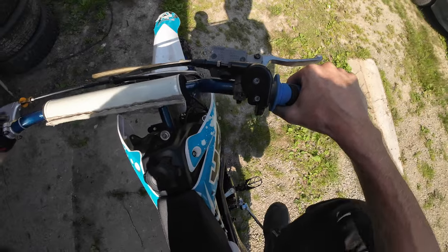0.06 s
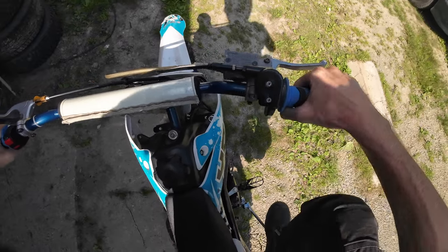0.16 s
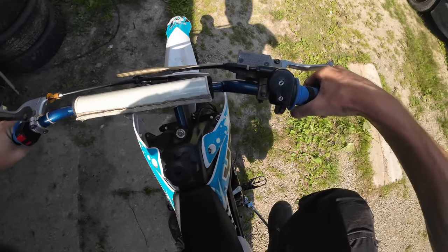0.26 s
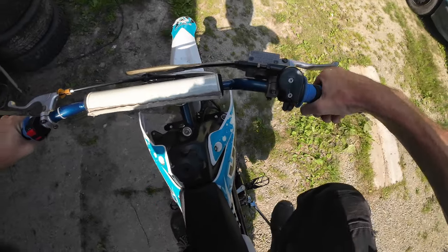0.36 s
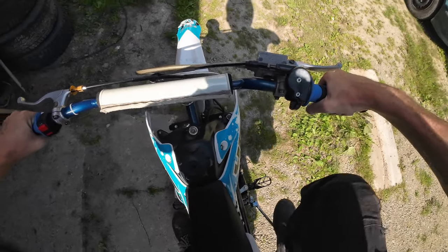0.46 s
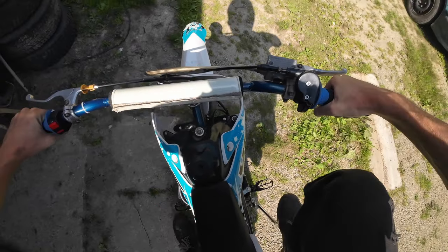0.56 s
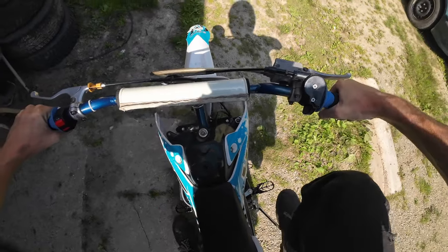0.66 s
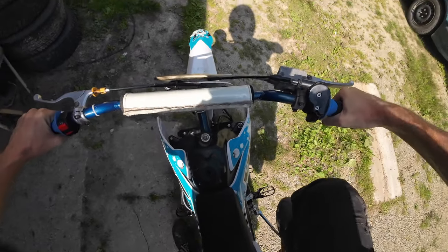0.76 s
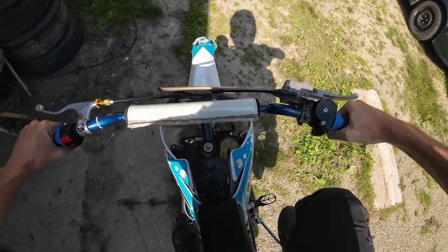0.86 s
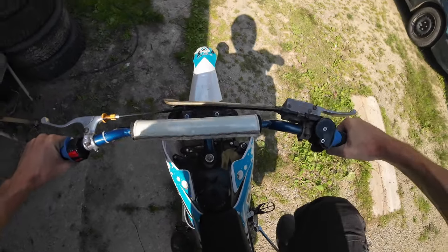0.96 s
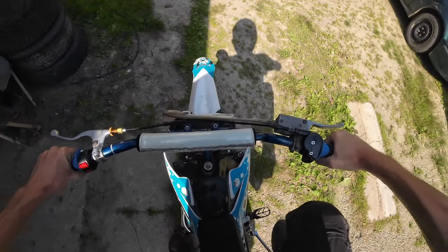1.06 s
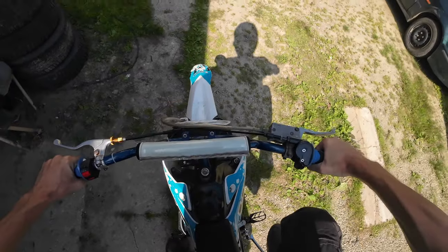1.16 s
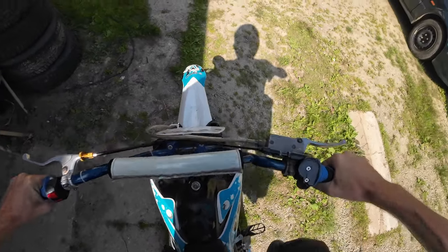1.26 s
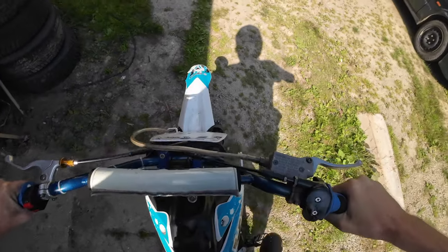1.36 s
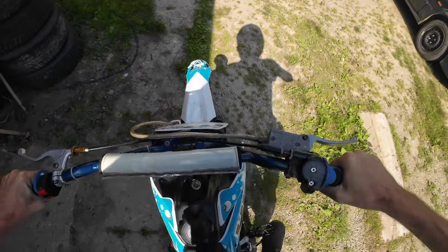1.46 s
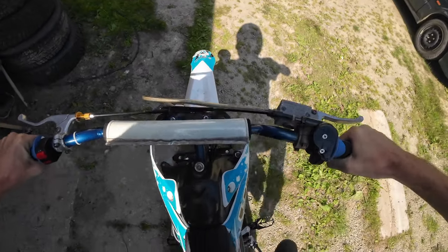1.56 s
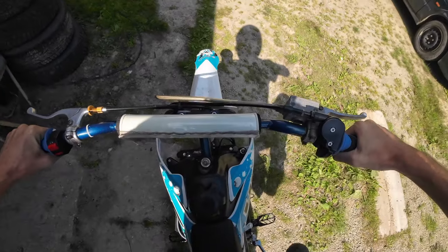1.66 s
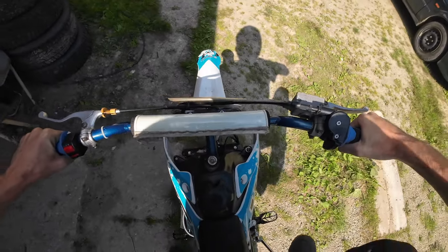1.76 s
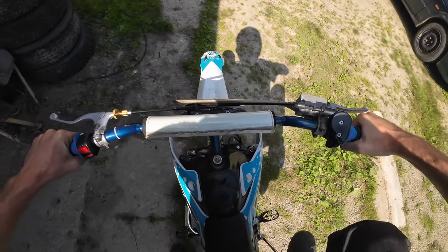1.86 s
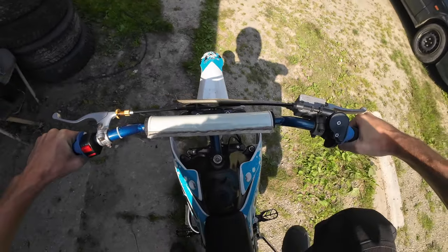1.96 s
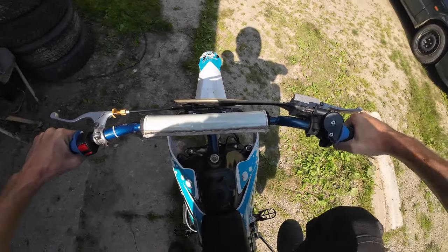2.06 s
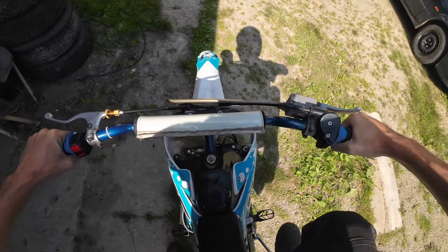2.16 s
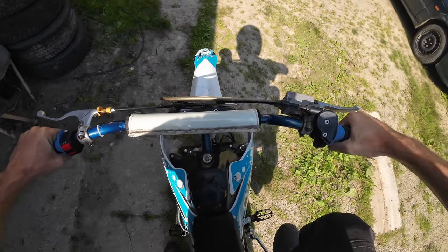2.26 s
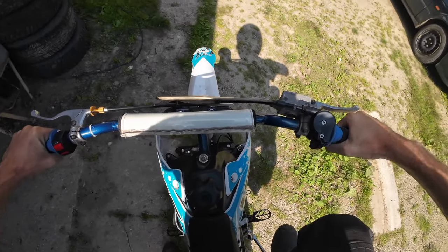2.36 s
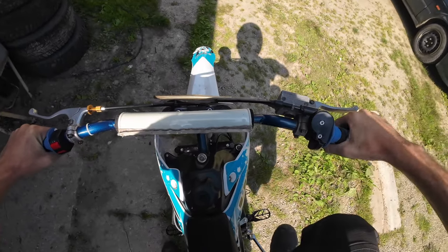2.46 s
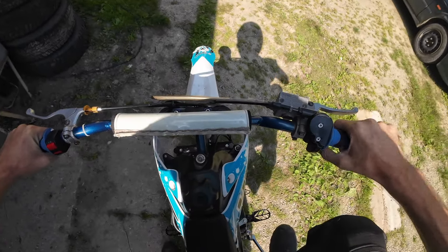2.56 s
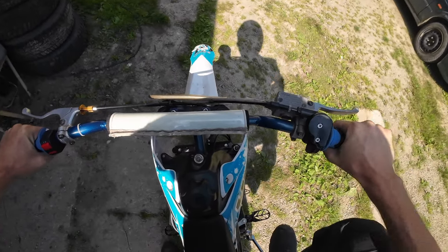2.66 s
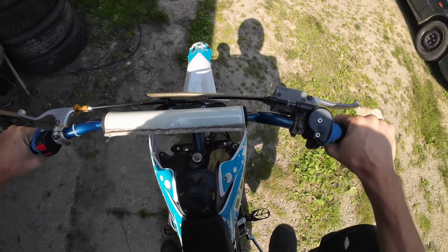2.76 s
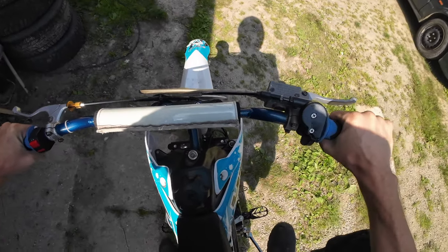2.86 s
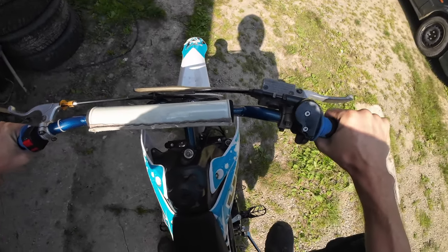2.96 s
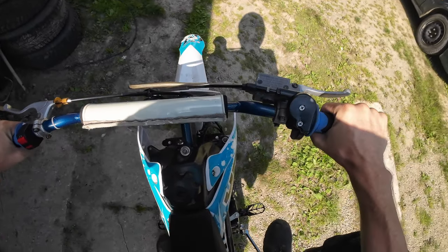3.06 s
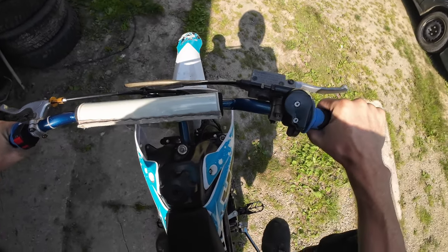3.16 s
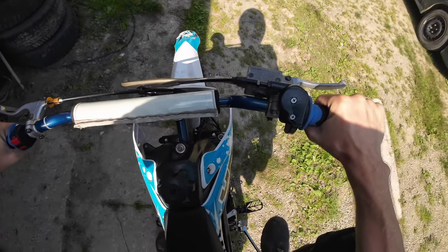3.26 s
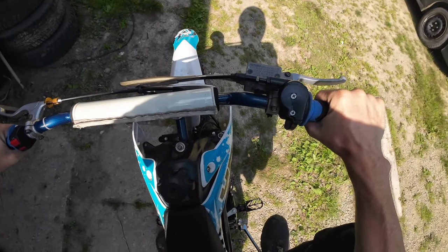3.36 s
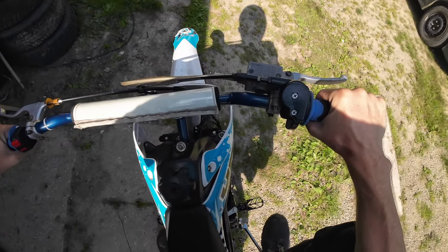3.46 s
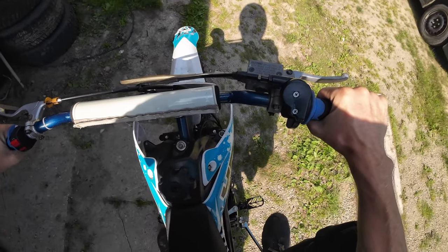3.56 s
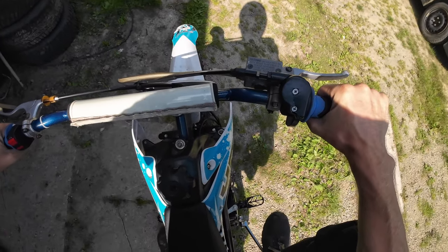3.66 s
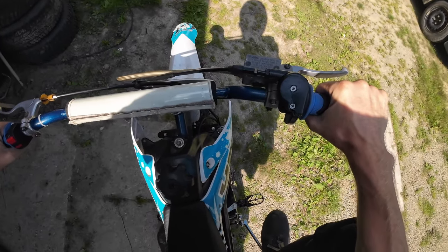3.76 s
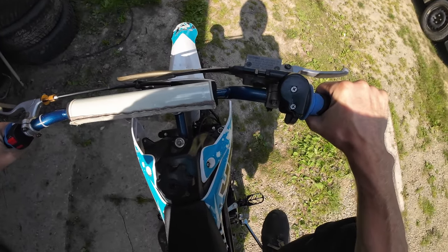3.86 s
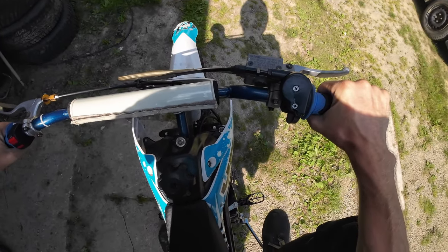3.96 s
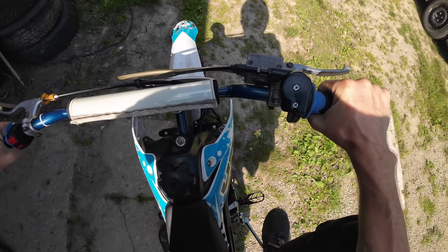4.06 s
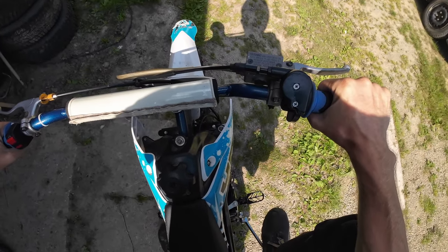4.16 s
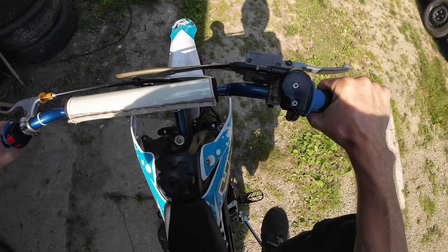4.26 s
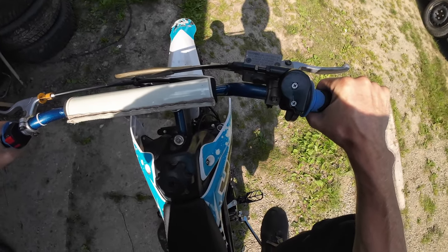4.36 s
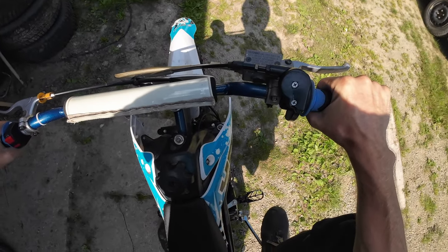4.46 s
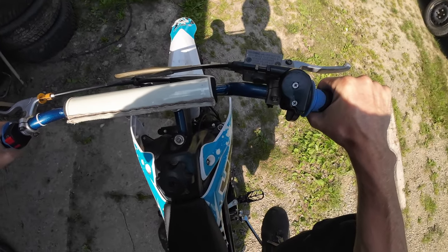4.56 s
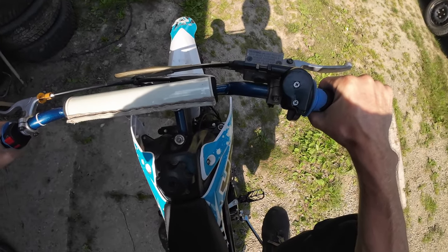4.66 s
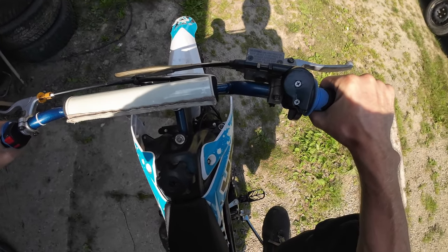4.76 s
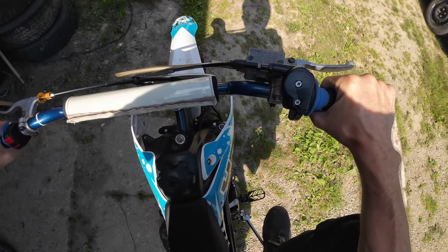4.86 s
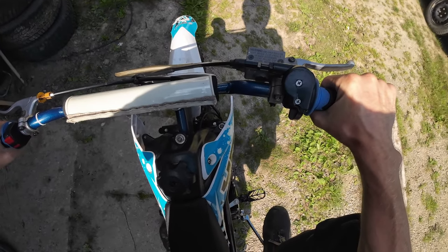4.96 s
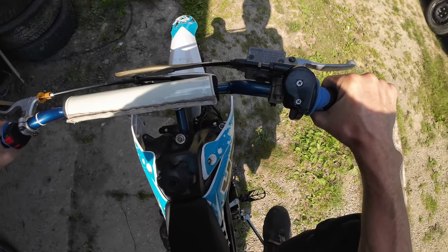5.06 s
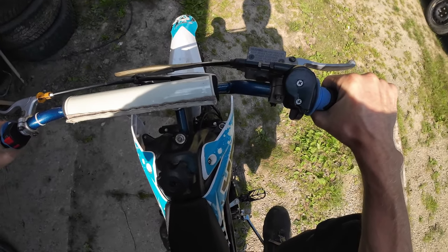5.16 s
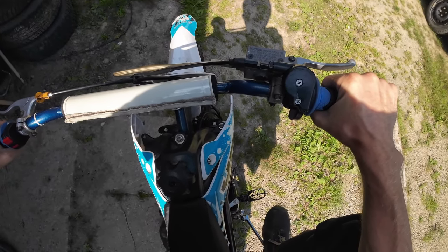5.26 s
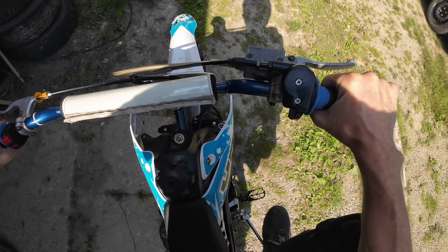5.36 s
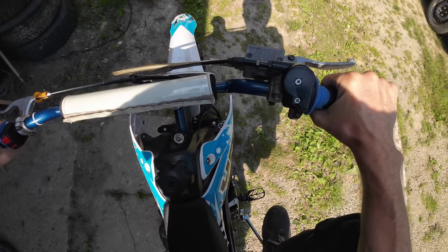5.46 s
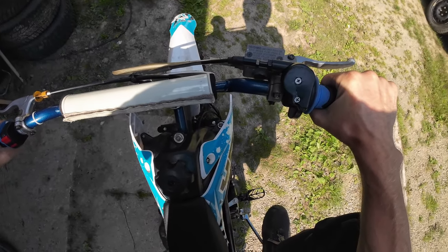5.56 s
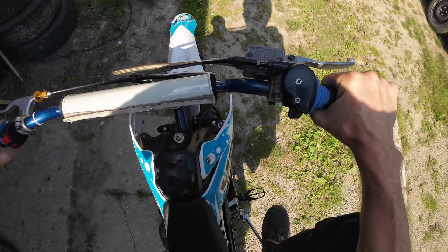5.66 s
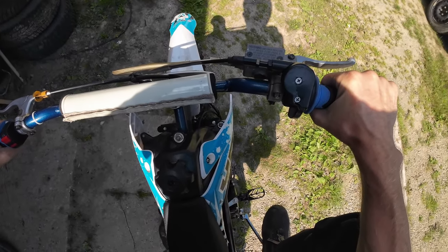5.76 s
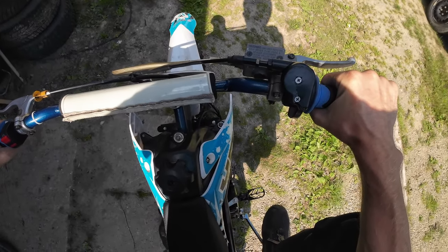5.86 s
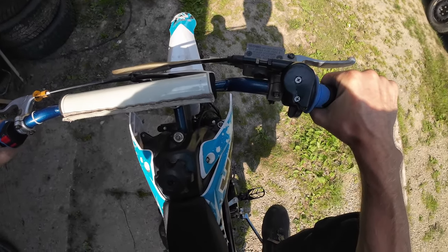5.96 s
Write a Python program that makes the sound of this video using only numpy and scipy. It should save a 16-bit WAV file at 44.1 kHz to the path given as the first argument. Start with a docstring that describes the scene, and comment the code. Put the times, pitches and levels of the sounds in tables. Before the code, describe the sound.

Small dirt bike fails to start: metallic clicks, three quick deep chugs under rattling gears, a sharp lever clack, quiet yard, then buffeting gusts.

```python
"""The engine of a small dirt bike chugs over three times from one kick and does not start.
Each chug is a short sine boom with a puff of exhaust; ringing noise bursts make the ratchet clicks, and
many tiny ringing contacts make the whirr of the gears. Noise bursts and sines make the lever clack, first
as it folds out and again as it goes back. Behind it, shaped noise makes far cars, clothing and a windy gust
that thumps the microphone on the rider's head. A throttle grip ticks and an insect rasps faintly."""
import sys
import numpy as np
from scipy import signal
from scipy.fft import rfft, irfft
from scipy.io import wavfile

SR = 44100
rng = np.random.default_rng(int(sys.argv[2]) if len(sys.argv) > 2 else 0)


def wav_record(signal):
    """Record a signal, one row per channel, as 16-bit PCM in the file named by sys.argv[1]."""
    frames = np.transpose(np.atleast_2d(signal))
    bounded = np.clip(frames, -1, 1)
    # unit amplitude maps onto the largest positive 16-bit level
    quanta = np.round(bounded * 32767).astype(np.int16)
    wavfile.write(sys.argv[1], SR, quanta)


N = 264688
TIME = np.arange(N) / SR

# The piston strokes. Each row: start in seconds, level in dB, airbox pitch in Hz, length in seconds,
# level of the opening thud in dB, delay of the exhaust puff in seconds, level of the puff in dB.
STROKES = [(1.3933, -10.5, 78.2, 0.023, -28, 0.029, -21.5), (1.482, -11, 85, 0.058, -17.5, 0.023, -18.5),
           (1.583, -9.5, 80.6, 0.041, -37, .039, -25)]
# The pitches at which the crankcase rings. Each row: pitch in Hz, level in dB, time to fall 60 dB in seconds.
CRANKCASE = [(322, -0.5, .12), (464, -5.5, 0.16), (809, -5, 0.17), (1226, -7.5, 0.14), (1353, -6, .3),
             (1508, -2.5, .1), (1700, -7.5, .08), (1826, -1, 0.13), (1910, 0, .15), (2616, -2.5, .06),
             (3060, -3.5, 0.068), (3648, -8.5, .12), (4340, -7, 0.11), (5226, -7, .1), (6270, -4, .12)]
# The tone of moving air. Each row: frequency in Hz, level in dB per Hz.
WIND_TONE = [(12, -2), (25, 4), (55, -6.5), (90, -16), (160, -28), (300, -44.5), (700, -69)]


def from_db(db):
    """Turn decibels into a gain."""
    return 10 ** (np.asarray(db) / 20)


def rms_one(x):
    """Scale to unit power."""
    return x / np.sqrt(np.mean(x ** 2) + 1e-20)


def noise(count=N):
    """Two rows of white noise: hiss with equal power at all frequencies."""
    return rng.standard_normal((2, count))


def between(start, end, fade=.02):
    """A gain of one inside a time span, with soft edges."""
    return np.clip(np.minimum(TIME - start, end - TIME) / fade, 0, 1)


def bump(s, length):
    """A bell-shaped rise and fall around a moment."""
    return np.exp(-.5 * ((TIME - s) / length) ** 2)


def swell(s, db, rise_db_per_s, fall_db_per_s):
    """A gain that climbs to a peak and sinks again."""
    return from_db(db - np.maximum(rise_db_per_s * (s - TIME), fall_db_per_s * (TIME - s)))


def held(start, attack, end, fall_db_per_s):
    """A gain that rises, holds at one and then dies away."""
    return np.clip((TIME - start) / attack, 0, 1) * from_db(-fall_db_per_s * np.maximum(TIME - end, 0))


def dying(t60, count=20000):
    """Exponential decay from 1 that falls 60 dB in t60 seconds."""
    return np.exp(-np.log(1000) * np.arange(count) / SR / t60)


def response(points, tilt=0, size=8192):
    """A filter (minimum-phase impulse response) with a given spectrum, falling away above its last point."""
    hz, db = np.transpose(points)
    octave = np.log2(np.maximum(np.arange(size // 2 + 1), .5) * SR / size)
    shape_db = np.interp(octave, np.log2(hz), db) - 20 * np.maximum(octave - np.log2(hz[-1]), 0)
    tilt_db = tilt * np.maximum(octave, np.log2(hz[0]))
    # folding the cepstrum puts the energy of the response as early as possible
    cepstrum = irfft(np.log(from_db(shape_db + tilt_db)))
    cepstrum[1:size // 2] *= 2
    cepstrum[size // 2 + 1:] = 0
    return irfft(np.exp(rfft(cepstrum)))


def through(x, impulse):
    """Filter along time by convolution, keeping the length."""
    return signal.fftconvolve(np.atleast_2d(x), np.atleast_2d(impulse), axes=-1)[:, :x.shape[-1]]


def colour(x, points, tilt=0):
    """Give a spectrum to white sound and keep its power."""
    impulse = response(points, tilt)
    return through(x, impulse / np.linalg.norm(impulse))


def spread(pair):
    """Two unrelated signals become left and right, alike in the bass and apart in the treble."""
    # The width of the sound. Each row: frequency in Hz, level of the side signal against the middle in dB.
    side_level = [(60, -15.5), (300, -15.5), (1300, -17), (2400, -10), (4400, -7.5), (8000, -2.5),
                  (15000, -2)]
    return pair[0] + through(pair[1], response(side_level)) * [[1], [-1]]


def ring(x, hz, t60):
    """A resonance: a unit click sets a dying sine of height 1 going."""
    r = from_db(-60 / (t60 * SR))
    w = 2 * np.pi * hz / SR
    return signal.lfilter([0, np.sin(w)], [1, -2 * r * np.cos(w), r * r], x + 1e-18)


def add(out, s, sound):
    """Mix a sound in at a time in seconds."""
    at = int(s * SR)
    out[:, at:at + sound.shape[-1]] += sound[:, :N - at]


def contact(points, tilt, t60, tail_db, tail_t60):
    """A knock: crowded resonances, heard as noise, that die at once, and a weaker tail."""
    fall = dying(t60) + from_db(tail_db) * dying(tail_t60)
    return colour(noise(len(fall)) * fall, points, tilt)


def chugs(rise_s=0.002, fall_s=0.0021, sag_s=0.08, steepen=0.12, tail_db=-18.5, thud_t60=0.09):
    """Each stroke opens with a thud, draws a few cycles of airbox boom, then puffs unburnt through the pipe."""
    # The hum of tank and frame. Each row: pitch in Hz, level in dB, time to fall 60 dB in seconds.
    frame_modes = [(91.26, 3, 0.57), (136, -6, 0.57)]
    # The exhaust resonances. Each row: pitch in Hz, width in Hz, level in dB.
    pipe_modes = [(135, 24, -1.5), (200, 25, -6), (252, 22, -5), (327.3, 23, -1.5), (445, 20, -14)]
    # The tone of the opening thud. Each row: frequency in Hz, level in dB per Hz.
    thud_tone = [(60, -10.5), (130, 3), (180, -9.5), (250, -1), (340, -16), (450, -14), (560, -33)]
    out = np.zeros((2, N))
    age = np.arange(SR // 2) / SR
    for s, db, hz, length, thud_db, delay, puff_db in STROKES:
        opening = 1 - np.exp(-age / rise_s)
        valve = opening * np.exp(-age / sag_s - np.maximum(age - length, 0) / fall_s)
        boom = valve * np.sin(2 * np.pi * hz * age)
        boom = boom + steepen * (boom ** 2 + boom ** 3)   # strong pressure swings grow pointed
        hum = np.zeros(len(age))
        for mode_hz, mode_db, t60 in frame_modes:
            tone = np.sin(2 * np.pi * mode_hz * age)
            hum += from_db(tail_db + mode_db) * tone * dying(t60, count=len(age))
        add(out, s, (from_db(db) * (boom + hum))[None])
        thud = contact(thud_tone, 0, thud_t60, tail_db=-25.5, tail_t60=0.27)[:1]
        add(out, s, from_db(thud_db) * thud)
        puff = np.zeros(len(age))
        for k, (pipe_hz, width, pipe_db) in enumerate(pipe_modes):
            tone = np.sin(2 * np.pi * pipe_hz * age) * np.exp(-np.pi * width * age)
            puff += from_db(pipe_db) * tone * (-1) ** k   # neighbours start in opposite directions
        add(out, s + delay, (from_db(puff_db) * puff)[None])
    return out


def ratchet(vary_db=3.5, tilt_db=1.0, crack_db=1.5, crack_t60=.007, tail_db=-20.5, case_db=-26.0, count=17):
    """Starter teeth ride over each other, faster, then slower with the crank; each rings the crankcase."""
    # The pace of the ratchet. Each row: time in seconds, gap to the next tooth in seconds.
    tooth_gap = [(1.4867, .0163), (1.503, .0116), (1.572, .0117), (1.585, .0152), (1.723, .0276)]
    # The tone of a tooth, before each one varies. Each row: frequency in Hz, level in dB per Hz.
    tooth_tone = [(290, -37), (500, -7), (659, -8.5), (784, -2.5), (960, -9.5), (1080, -1.5), (1210, 2.5),
                  (2540, -1), (3200, 1), (5240, 2), (6800, -5), (11500, -7.5), (13300, -28), (15100, -21.5),
                  (16000, -33)]
    tooth_db, fade_db_per_s = -23.5, 12   # later teeth land more softly
    # the first tooth breaks loose under load, the last barely lifts
    accents_db = [1.5] + [0] * (count - 2) + [-6]
    crack = from_db(crack_db) * dying(crack_t60)
    rattle = from_db(-2.5) * dying(0.0317)
    fall = crack + rattle + from_db(tail_db) * dying(.15)
    out, knocks = np.zeros((2, N)), np.zeros(N)
    s = first = tooth_gap[0][0]
    for accent_db in accents_db:
        landing = [(hz, band_db + rng.normal(0, vary_db)) for hz, band_db in tooth_tone]
        strength = from_db(tooth_db + accent_db - fade_db_per_s * (s - first))
        add(out, s, strength * colour(noise(len(fall)) * fall, landing, tilt_db))
        knocks[int(s * SR)] = strength
        s += np.interp(s, *np.transpose(tooth_gap))
    case = sum(from_db(case_db + db) * ring(knocks * rng.standard_normal(N), hz, t60)
               for hz, db, t60 in CRANKCASE)
    return spread(out) + case


def gears(mesh_db=-3.5, case_db=-10.5, ticks_per_s=1800, size_db=4.5, tick_t60=.025, smooth_db=-8.0,
          take_up_s=.06, vent_db=-38.5, vent_fall_db_per_s=260, grain_share=.25, grain_s=.001, count=40):
    """Gears and chain rattle in small ringing contacts, denser with effort; each exhaust puff adds a hiss."""
    # The tones of the whirr and of its hiss. Each row: frequency in Hz, level in dB per Hz.
    whirr_tone = [(120, -38), (200, -4), (330, -9), (384, -13), (446, -13.5), (642, -21), (784, -10.5),
                  (995, -15.5), (1140, -9.5), (1620, -15), (1860, -11), (2300, -18), (4000, -25),
                  (5200, -49.5), (8800, -120)]
    hiss_tone = [(2200, -23), (3700, -1.5), (5500, 2.5), (7200, -7.5), (10000, -4), (11600, -3.5),
                 (13000, -18.5), (15000, -13.5), (16000, -14)]
    turning = between(1.348, 1.84, fade=take_up_s)
    # the gears swell under the boot
    effort = turning * swell(1.51, -31.5, rise_db_per_s=70, fall_db_per_s=43)
    load = effort / effort.max()
    density = np.sqrt(load)
    happens = rng.random(N) < density * ticks_per_s / SR
    size = from_db(size_db * np.clip(rng.standard_normal(N), -2, 2))
    ticks = happens * size * rng.choice([-1, 1], N)
    ticks = ticks / np.sqrt(density + 1e-3)   # sparse ticks are made larger to even out the power
    # each tick is dealt at random to one of the pitches
    dealt = rng.integers(0, count, N)
    pitches = np.linspace(350, 4000, count)
    grains = sum(ring(ticks * (dealt == k), hz, tick_t60) for k, hz in enumerate(pitches))
    whirr = from_db(smooth_db) * noise()
    whirr[0] += .5 * grains / grains[turning > 0].std()
    whirr = from_db(mesh_db) * colour(whirr * effort, whirr_tone)
    # the crankcase rings mainly under the heaviest load
    shake = noise()[0] * from_db(case_db) * effort * load
    case = sum(from_db(db) * ring(shake, hz, t60) / np.sqrt(t60 * SR / 20) for hz, db, t60 in CRANKCASE)
    # the contacts also spit treble
    spits = signal.lfilter([1], [1, -np.exp(-1 / (grain_s * SR))], ticks ** 2 + 1e-18)
    grainy = np.sqrt(1 - grain_share + grain_share * spits / spits[turning > 0].mean())
    rasp = turning * swell(1.535, -38, rise_db_per_s=98, fall_db_per_s=62) * grainy
    vents = sum(held(s + delay - .003, .003, s + delay, vent_fall_db_per_s)
                for s, *_, delay, _ in STROKES)
    hiss = colour(noise() * np.hypot(rasp, from_db(vent_db) * vents), hiss_tone)
    return spread(whirr + hiss) + case


def lever(ring_db=3.5, pivot_db=-2.0, folded_s=1.0):
    """Knocks ring the pivot while the lever is folded out and the lever itself afterwards."""
    # Contacts of lever and foot peg, and the dull knocks of the gears engaging near 1.32 and 1.36 s.
    # Each row: start in seconds, level in dB, tilt in dB per octave, time to fall 60 dB in seconds.
    clack_hits = [(0.26, -54.5, 1, 0.018), (0.355, -45.5, -4.5, .011), (0.6318, -29, 1, 0.028),
                  (0.634, -33, -1.5, 0.038), (0.787, -40, -5, 0.082), (0.792, -40.5, 9.5, 0.039),
                  (0.799, -36, -7.5, .028), (1.251, -44, 6, 0.034), (1.321, -46.5, -7, .18),
                  (1.359, -44, -4.5, 0.28), (1.8629, -27, 1.5, 0.017), (1.866, -23, 3, .033),
                  (2.129, -51, -2, .046), (2.132, -45, -7, .05), (2.481, -64, 3, 0.046),
                  (2.511, -56.5, -3, 0.026), (2.657, -51, -8, .05)]
    # The dry pivot slips as the lever swings out. Each row: start in seconds, level in dB,
    # time to fall 60 dB in seconds.
    pivot_slips = [(0.542, -60, 0.074), (0.562, -46, 0.06), (0.611, -58, 0.15), (0.781, -47, 0.077)]
    # Ringing of the lever and of its pivot. Each row: pitch in Hz, level in dB, time to fall 60 dB in seconds.
    lever_modes = [(1349, -6.5, .33), (1640, 0, 0.0994), (2360, -9.5, 0.18), (2960, -5.5, 0.2),
                   (3250, -3, .13), (3160, -4, 0.15), (3247, -1, 0.17), (4620, -7, 0.12), (4700, -8, 0.2),
                   (5070, -8.5, .15), (5335, -6.5, 0.18), (5600, -6, 0.13), (6277, -11.5, 0.24),
                   (6923, -14.5, .18), (8700, -13.5, .17), (8800, -11, .13)]
    pivot_modes = [(1184, -20, .25), (1954, -11, .18), (2632, -4, .38), (3478, 3, .12), (3640, 1, .1),
                   (5098, -7, .16)]
    # The tone of a knock, before its tilt. Each row: frequency in Hz, level in dB per Hz.
    clack_tone = [(150, -11), (500, -7.5), (1000, -0.5), (1700, 0.5), (3200, -3), (4000, -4.5),
                  (5200, -0.5), (7500, -13.5), (11000, -10), (13000, -28), (16000, -27)]
    slip_tone = [(600, -2.5), (1500, 3), (3200, -10), (4900, 3.5), (6500, -22), (10000, -28), (13000, -39)]
    out = np.zeros((2, N))
    for s, db, tilt, t60 in clack_hits:
        ringing_db = -19 + 1.8 * min(tilt, 0)   # dull blows ring less
        hit = contact(clack_tone, tilt, t60, tail_db=ringing_db - 1, tail_t60=.22)
        age = np.arange(hit.shape[1]) / SR
        modes, modes_db = (pivot_modes, pivot_db) if s < folded_s else (lever_modes, ring_db)
        for hz, mode_db, mode_t60 in modes:
            strength = from_db(modes_db + ringing_db + mode_db + rng.normal(0, 1.5, (2, 1)))
            tone = np.sin(2 * np.pi * (hz * age + rng.random((2, 1))))
            hit = hit + strength * tone * dying(mode_t60)
        add(out, s, from_db(db) * hit)
    for s, db, t60 in pivot_slips:
        add(out, s, from_db(db) * contact(slip_tone, 0, t60, tail_db=-17, tail_t60=0.18))
    return spread(out)


def lever_stop(t60=0.05):
    """The lever reaches the bottom of its swing: a short noise burst clinks amid the ratcheting."""
    clink_tone = [(1200, -26.5), (2200, -17.5), (2580, -4), (2900, -15), (6000, -14), (11000, -18)]
    out = np.zeros((2, N))
    add(out, 1.617, from_db(-29) * contact(clink_tone, 0, t60, tail_db=-27, tail_t60=.12))
    return spread(out)


def yard(x, delay_s=0.0043):
    """Ground, wall and parked things scatter a short, duller tail."""
    fall = dying(0.18) * (np.arange(20000) > delay_s * SR)
    tail_tone = [(100, 1.5), (1000, 4.5), (5000, 3.0), (14000, -11.5)]
    tail = colour(noise(len(fall)) * fall, tail_tone)
    return from_db(-17) * through(x.mean(0), spread(tail / np.linalg.norm(tail[0])))


def grip():
    """One small plastic tick, from two close contacts, as the hand takes a new hold."""
    # The throttle grip ticks in its housing. Each row: start in seconds, level in dB,
    # time to fall 60 dB in seconds.
    grip_ticks = [(2.743, -49, .012), (2.745, -42.5, 0.018)]
    # The tone of the tick. Each row: frequency in Hz, level in dB per Hz.
    grip_tone = [(500, -20), (1400, 4.5), (2500, -12), (4500, -9.5), (7200, 5), (9000, -8), (12000, -11),
                 (14000, -28)]
    out = np.zeros((2, N))
    for s, db, t60 in grip_ticks:
        add(out, s, from_db(db) * contact(grip_tone, 0, t60, tail_db=-40, tail_t60=.05))
    return spread(out)


def sway(sway_hz=18.5, start_s=1.27, end_s=1.734, flutter_db=-6.0, attack_s=0.11):
    """A slow pressure wobble with some turbulence, mostly on the kicking side, the right."""
    wobble = np.sin(2 * np.pi * sway_hz * (TIME - start_s))
    wave = wobble + from_db(flutter_db) * colour(noise(), WIND_TONE)
    lunge = held(start_s, attack_s, end_s, fall_db_per_s=72)
    return lunge * wave * from_db([[-36], [-16]])   # left, right


def wind(attack_s=0.095):
    """A light breeze comes from the right; then a gust rumbles and its eddies thump each microphone port."""
    # Eddies thump the microphone. Each row: middle in seconds, level in dB, length in seconds,
    # tilt in dB per octave.
    eddies = [(0.027, -39.5, .05, -12), (0.507, -40.5, .04, -8.5), (4.208, -38, 0.023, -7),
              (4.285, -26, 0.014, -3.5), (4.366, -28.5, .013, -11), (4.453, -27, .018, -1),
              (4.635, -25.5, .022, -5.5), (4.685, -26, 0.012, 1), (4.816, -27, 0.017, -3.5),
              (4.915, -29, .02, 0.5), (5.018, -31, 0.032, -10), (5.12, -32, 0.027, -3.5),
              (5.373, -34.5, .014, -6), (5.476, -36, .016, -1.5), (5.698, -41, .03, -5.5),
              (5.86, -36, 0.037, -3.5)]
    # The tone of a thump, before its tilt. Each row: frequency in Hz, level in dB per Hz.
    eddy_tone = [(20, -5), (50, 4.5), (130, -7), (250, -21), (400, -41.5), (900, -83)]
    breeze_tone = [(12, -4), (25, -0.5), (50, -17.5), (100, -30.0), (300, -54.5)]
    out = from_db([[-54], [-46]]) * colour(noise(), breeze_tone)   # left, right
    gust = from_db(-34.5) * held(4.08, attack_s, 5.03, fall_db_per_s=22.5)
    out += gust * colour(noise(), WIND_TONE)
    for s, db, length, tilt in eddies:
        shape = bump(s, length)
        near = shape > 1e-3   # only work where the thump can be heard
        eddy = shape[near] * colour(noise(near.sum()), eddy_tone, tilt)
        out[:, near] += from_db(db) * np.sqrt(np.mean(shape[near] ** 2)) * rms_one(eddy)
    return out


def surroundings(road_db=-61, air_db=-81, car_hiss_db=-24.5, cloth_db=-75.5, settled_s=2.95):
    """Far cars swell and fade with distance over a traffic drone, hissing most when closest; clothes rub."""
    # Cars go by on the far road. Each row: closest moment in seconds, level in dB,
    # time to half power in seconds.
    passing_cars = [(2.3, -64, 0.34), (3.06, -59, 0.17), (5.1, -51.5, .3)]
    # Sleeves and boot rub while the rider gets set. Each row: middle in seconds, level in dB,
    # length in seconds.
    cloth_rubs = [(0.01, -67.5, .035), (0.452, -74, 0.027), (1.012, -65, 0.036), (2.2, -69, 0.014)]
    # Tones of the steady road, the cars, the hiss and the drone. Each row: frequency in Hz, level in dB per Hz.
    road_tone = [(76, -23.5), (130, -3.5), (156, -6.5), (179, -10), (320, -14.5), (421, -15), (538, -15),
                 (581, -15.5), (850, -11.5), (1830, -20.5), (2440, -24), (3520, -32.5), (3860, -41.5),
                 (5000, -44.5), (6500, -77), (11000, -120)]
    car_tone = [(130, -6), (200, -9.5), (420, -15), (600, -10), (830, -7.5), (1200, -11.5), (1800, -20.5),
                (2600, -22.5), (3600, -32), (5000, -42), (6500, -69.5)]
    air_tone = [(2500, -6.5), (4000, 2), (5800, 3.5), (8500, -8), (10000, -5), (11300, -6.5),
                (12500, -19.5), (16000, -17)]
    drone_tone = [(35, -14.5), (60, 1.5), (78, 15), (100, -7), (125, -10.5), (200, -26), (400, -53.5)]
    cloth_tone = [(300, -2.5), (2500, 3.5), (3200, 3.5), (4300, 1), (6300, -8), (8500, -7.5),
                  (11300, -3.0), (12500, -14.0)]
    cars = np.sqrt(sum(from_db(db) ** 2 / (1 + ((TIME - s) / half) ** 2) for s, db, half in passing_cars))
    road = from_db(road_db) * colour(noise(), road_tone) + cars * colour(noise(), car_tone)
    car_hiss = from_db(car_hiss_db) * cars ** 2 / cars.max()
    air = np.hypot(from_db(air_db), car_hiss) * colour(noise(), air_tone)
    drone = swell(1.96, -48.5, rise_db_per_s=10, fall_db_per_s=7) * colour(noise(), drone_tone)
    # faint rubbing goes on until the rider sits still
    rubbing = from_db(cloth_db) * between(-1, settled_s, fade=0.25)
    rubbing = rubbing + sum(from_db(db) * bump(s, length) for s, db, length in cloth_rubs)
    cloth = rubbing * colour(noise(), cloth_tone)
    return spread(road + air + drone + cloth)


def far_engine(rumble_db=-58.5, hum_t60=0.12):
    """Exhausts of passing cars hum as noise through a resonance; a low rumble swells and fades late on."""
    # Exhaust hums. Each row: middle in seconds, level in dB, length in seconds, pitch in Hz.
    exhaust_hums = [(3.08, -53, 0.085, 120), (5.4, -55, .33, 156.4)]
    hum = sum(from_db(db) * bump(s, length) * rms_one(ring(noise()[0], hz, hum_t60))
              for s, db, length, hz in exhaust_hums)
    rumble_tone = [(100, -14.5), (240, 3.5), (330, -1.0), (450, -9.5), (600, -4.5)]
    rumble = from_db(rumble_db) * colour(noise()[0], rumble_tone)
    return hum + between(4.78, 6.19, fade=0.48) * rumble


def insect(hz=10300, length_s=0.05):
    """A far insect makes two faint, high rasps: noise through two resonances at one pitch."""
    # Each row: middle in seconds, level in dB.
    insect_calls = [(3.101, -81), (3.31, -84)]
    calls = sum(from_db(db) * bump(s, length_s) for s, db in insect_calls)
    return calls * rms_one(ring(ring(noise(), hz, .003), hz, 0.0033))


def scene():
    """The bike below the microphone, in its yard."""
    # The bike's metal, left against right. Each row: frequency in Hz, level on the left in dB,
    # mirrored on the right.
    left_lean = [(2400, -0.37), (4400, -0.59), (8000, 1.4), (15000, 1.4)]
    right_lean = [(hz, -db) for hz, db in left_lean]
    metal = ratchet() + gears() + lever() + lever_stop()
    metal = through(metal, [response(left_lean), response(right_lean)])
    bike = chugs() + metal
    return bike + yard(bike) + grip() + sway() + wind() + surroundings() + far_engine() + insect()


def record(dry):
    """A steep low-pass filter cuts the top treble, above 15900 Hz."""
    return signal.sosfilt(signal.ellip(10, .1, 80, 15900, fs=SR, output="sos"), dry)


dry = scene()
out = record(dry)
wav_record(out)
```